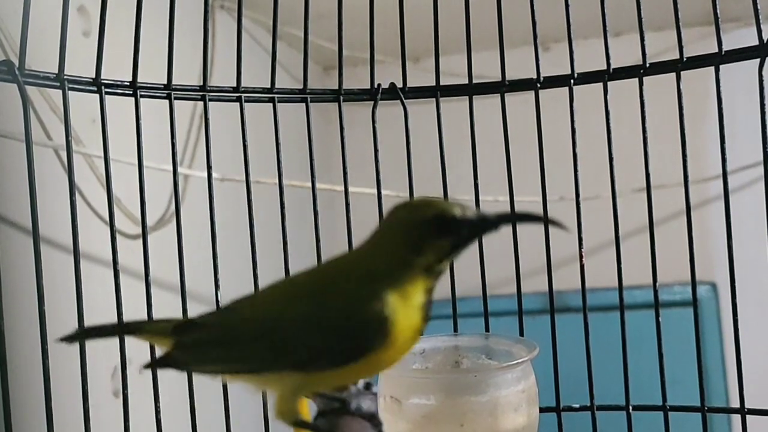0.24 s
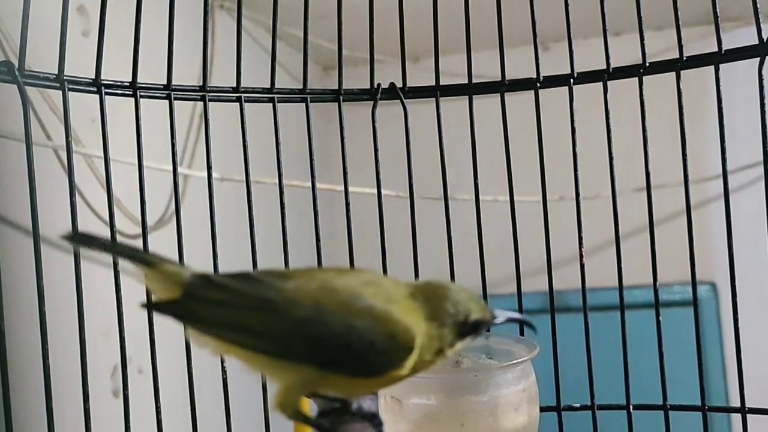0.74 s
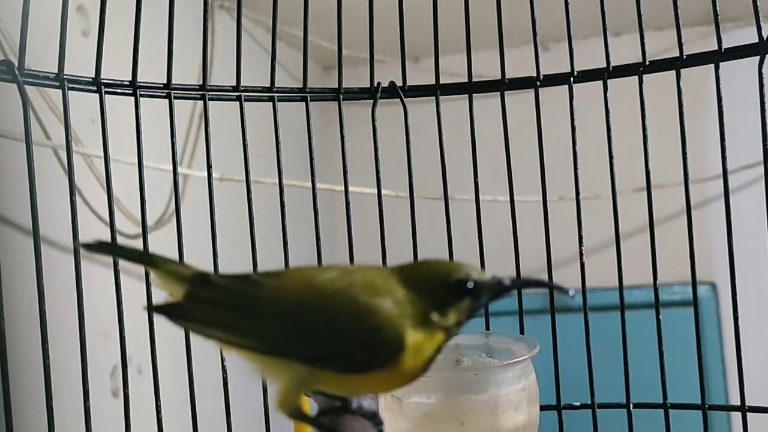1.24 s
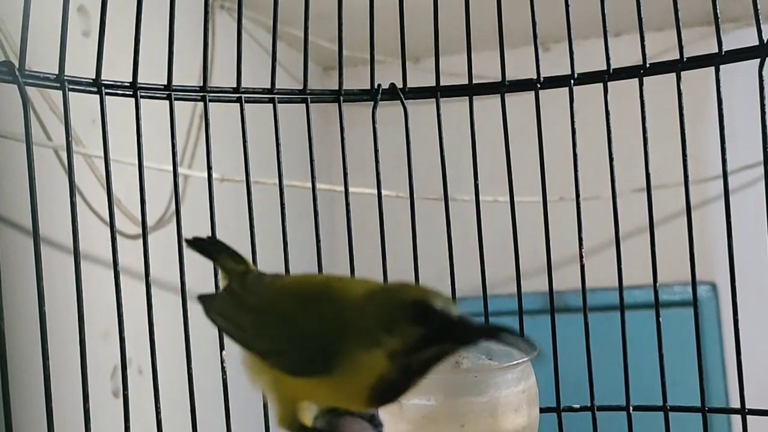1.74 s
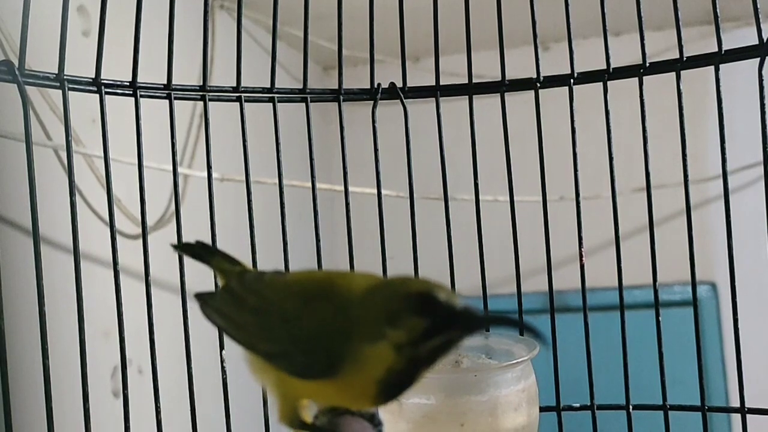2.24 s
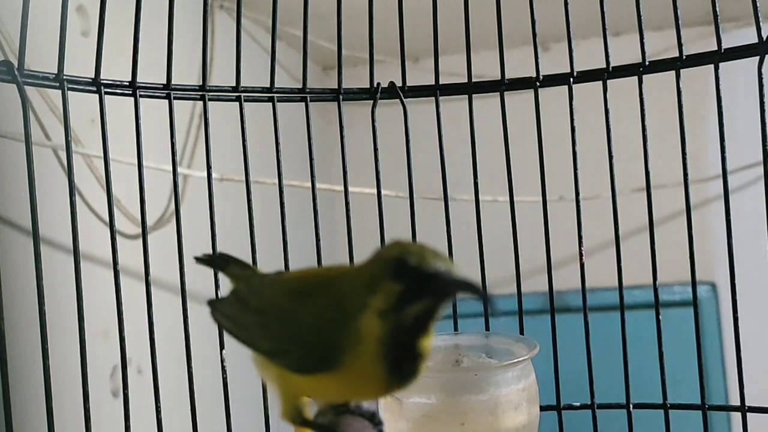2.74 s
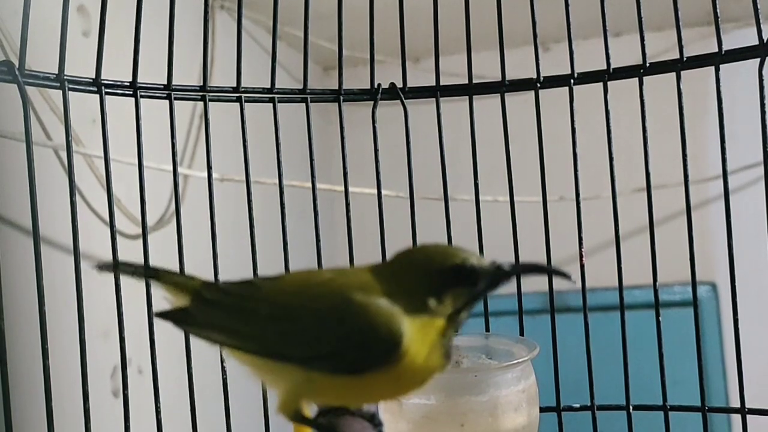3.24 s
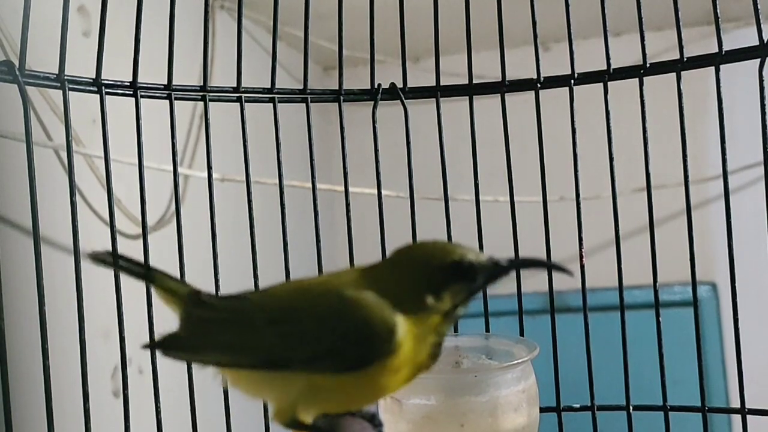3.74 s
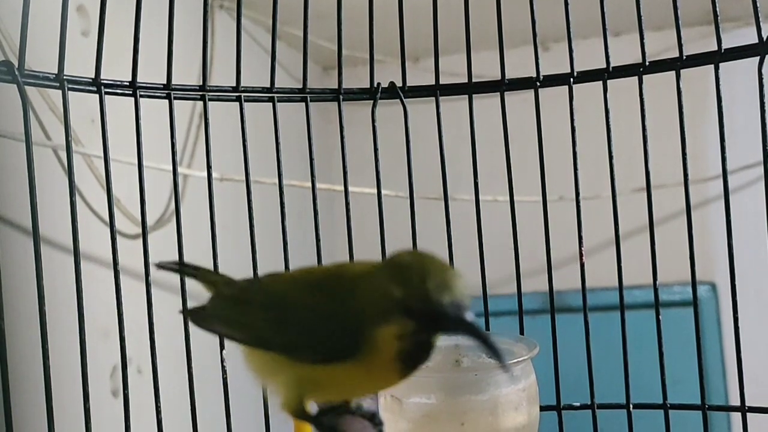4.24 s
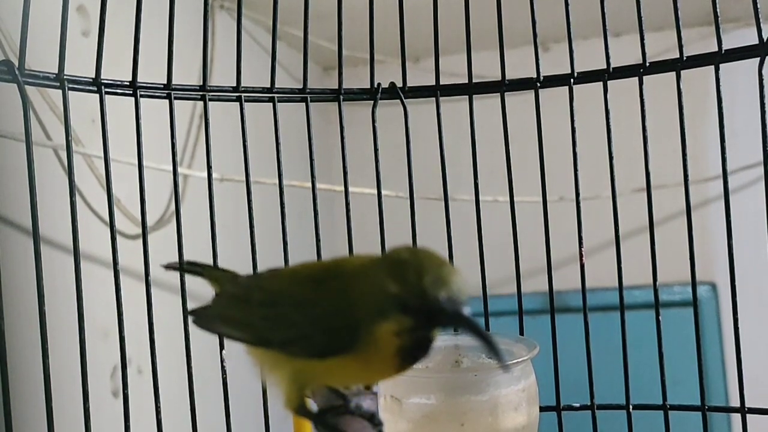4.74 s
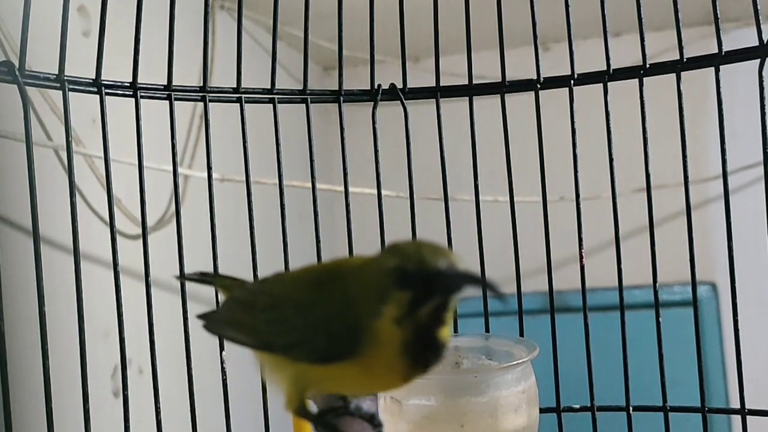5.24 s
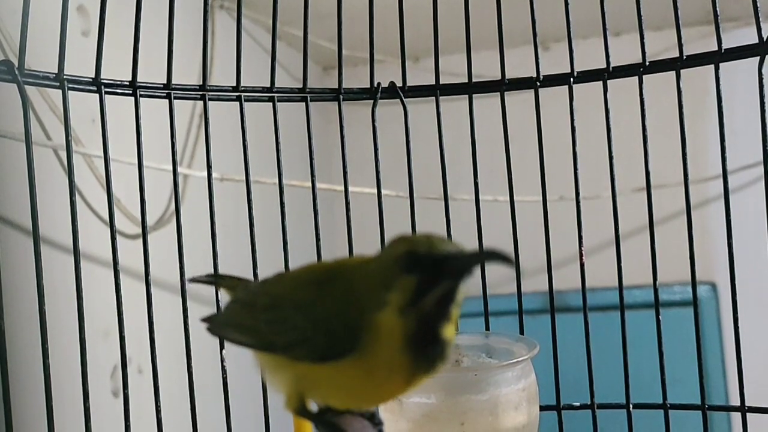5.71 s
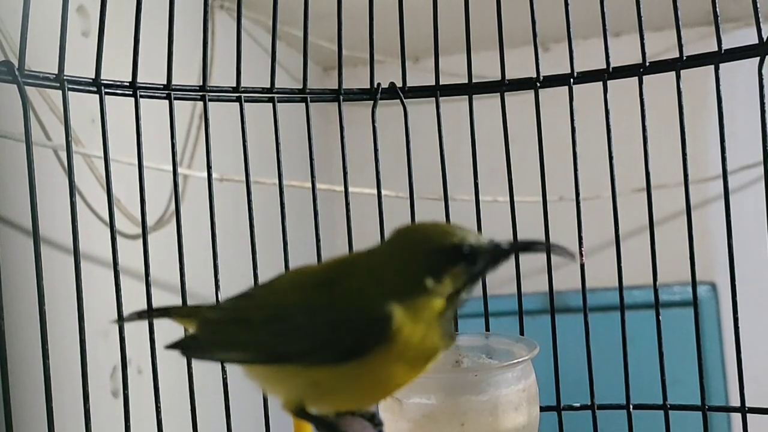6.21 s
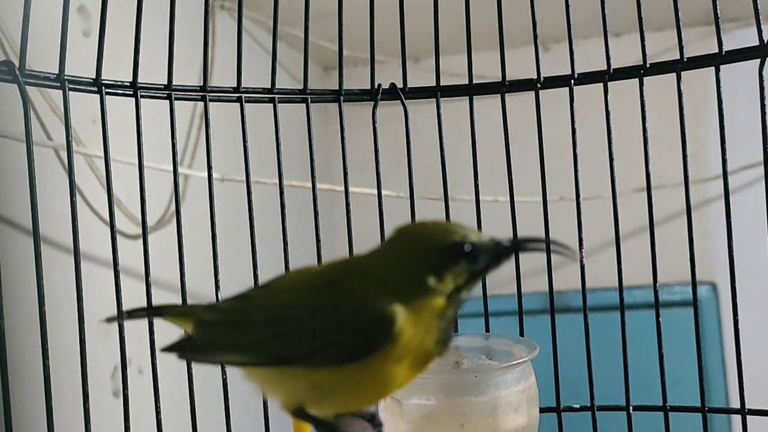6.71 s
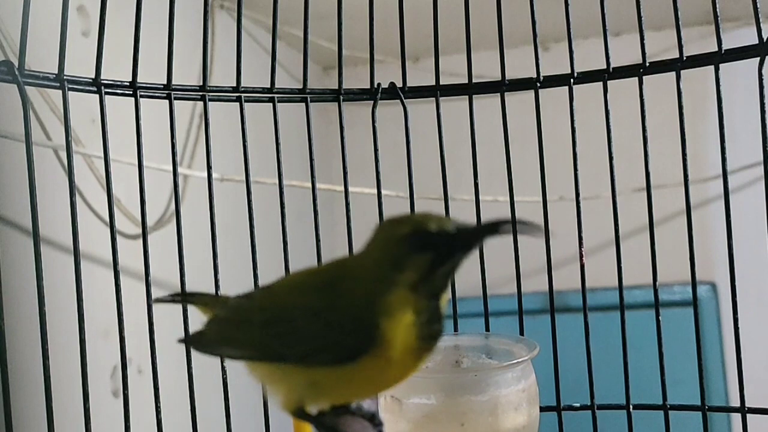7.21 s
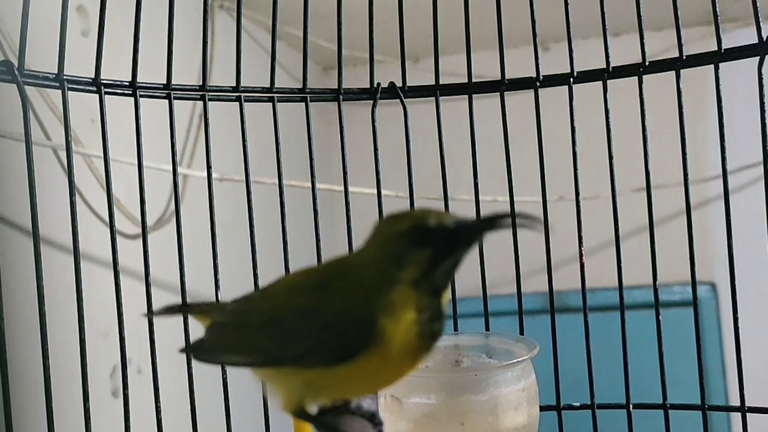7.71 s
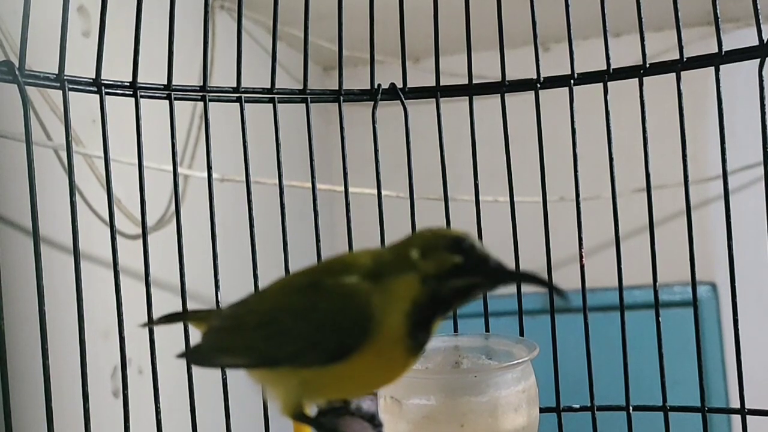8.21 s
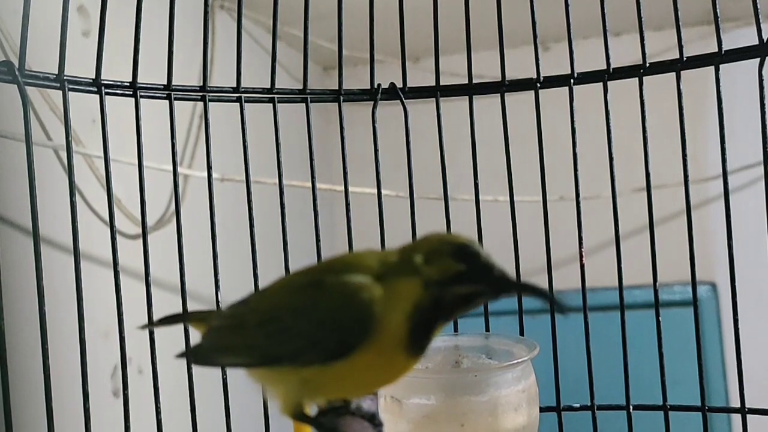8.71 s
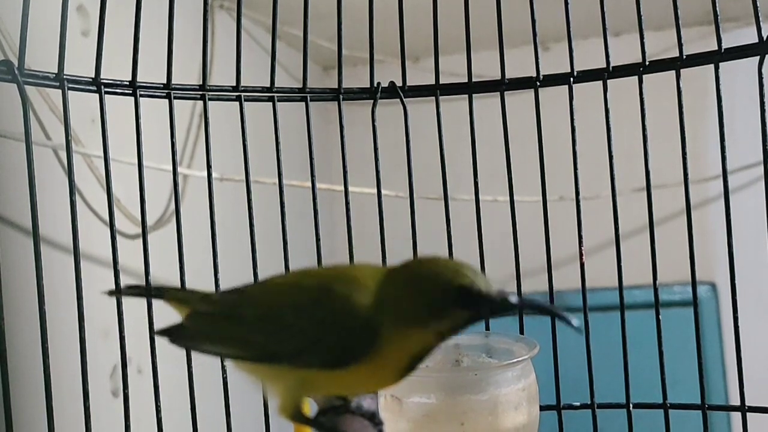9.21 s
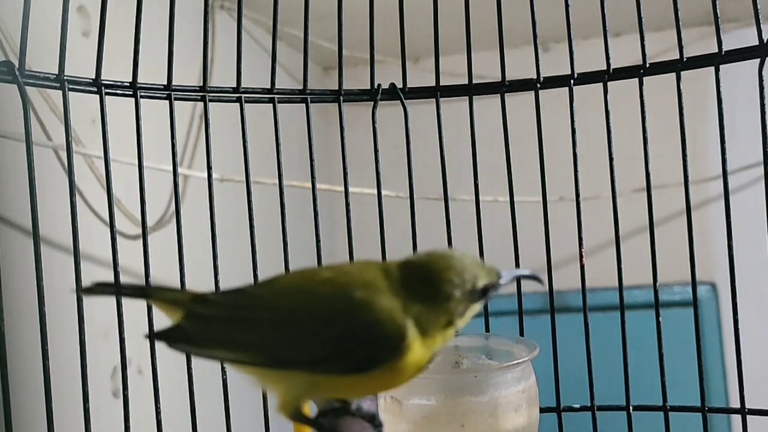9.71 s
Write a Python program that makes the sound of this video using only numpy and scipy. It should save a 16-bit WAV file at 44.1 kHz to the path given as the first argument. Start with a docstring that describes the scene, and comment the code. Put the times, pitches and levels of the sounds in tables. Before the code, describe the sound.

In a small hard-walled room, a caged sunbird close to the microphone softly rustles and bumps its perch, gives a faint scratch, a bright whistle with a squawk, then one loud rasping cheep. After a brief pause it begins quiet chips that thicken into faster, louder twittering with slurs and squeaks. Other small birds chirp thinly farther off, over soft air rush and faint low hum.

```python
"""In a small hard-walled room, a caged sunbird sings close to a camera: a rustle of wings, a few calls with one
loud rasping cheep, then a twitter that grows quicker and louder. Its chips, arching slurs, scratchy rasps and
winding calls are harmonics of one syrinx, shaped by throat and gape, sliding between clean tone and noise.
Other small birds chirp farther off as thin sets of lines, heard mostly through the room's echoes.
Shaped noise makes a low rush of air, and a wavering sine makes a motor's hum."""
import sys
import numpy as np
from scipy import signal
from scipy.fft import rfft, irfft, next_fast_len
from scipy.io import wavfile
from scipy.ndimage import uniform_filter1d, map_coordinates

SR = 44100
rng = np.random.default_rng(int(sys.argv[2]) if len(sys.argv) > 2 else 0)


def inscribe(sig):
    """Save sig as 16-bit PCM at rate SR to the path in sys.argv[1].

    A 1-D sig is mono; a 2-D sig holds one channel per row.
    Samples are clipped to [-1, 1] before scaling.
    """
    pcm = np.round(np.clip(np.atleast_2d(sig).T, -1, 1) * 32767)
    wavfile.write(sys.argv[1], SR, pcm.astype(np.int16))


N = 438794


def amp(db):
    """Decibels to gain."""
    return 10 ** (np.asarray(db) / 20)


def unit(x):
    """Scale to rms 1."""
    return x / np.sqrt(np.mean(x ** 2) + 1e-20)


def along(points, hz):
    """Read (Hz, value) points on a log axis."""
    f, v = np.transpose(points)
    return np.interp(np.log(np.abs(hz) + 1), np.log(f + 1), v)


def curves(rows, t):
    """Each column after the time, read at the times t."""
    s, *cols = np.transpose(rows)
    return [np.interp(t, np.sort(s), c) for c in cols]


def wobble(rate, size):
    """A smooth random curve with rate knots a second."""
    knots = rng.standard_normal(int(size * rate / SR) + 4)
    return map_coordinates(knots, [np.arange(size) * rate / SR])


def filtered(x, response):
    """x times a complex response of frequency."""
    m = next_fast_len(N + SR // 2)
    spectrum = rfft(x, m) * response(np.fft.rfftfreq(m, 1 / SR))
    return irfft(spectrum, m)[..., :N]


def add(track, t, sound):
    """Mix a sound into a track at its times."""
    track[round(t[0] * SR):][:len(t)] += sound


def partial(phase, rough, rasp_rate):
    """One line of a voice; chaotic vibration spreads the rough share of it into a band."""
    rough = np.clip(rough, 0, 1)
    chaos = wobble(rasp_rate, len(phase)) * np.sin(phase) + wobble(rasp_rate, len(phase)) * np.cos(phase)
    return np.sqrt(2 * (1 - rough ** 2)) * np.sin(phase) + rough * chaos


# Colour of the rushing air. Each row: frequency in Hz, relative level in dB.
AIR_COLOUR = [(25, -1), (120, -9.5), (265, -3.5), (305, -4.5), (345, 1), (400, -6), (950, -11), (5000, -23),
              (7500, -34.5), (10000, -50.5), (15000, -61)]
# How alike the air is left and right. Each row: frequency in Hz, likeness 0-1.
AIR_LIKENESS = [(60, 0.58), (300, 0.79), (700, 0.23), (1400, 0)]
# Swells of the motor. Each row: time in seconds, hum level in dB.
HUM_LEVEL = [(0, -60), (1.2, -54.5), (2.2, -54), (2.9, -62), (4, -61.5), (5.3, -55.5), (6.4, -55.5),
             (7.3, -66), (9.95, -58.5)]


def background(air_db=-53.5, drift_db=.4, hum_hz=48.8, waver_hz=0.51):
    """Air rushes softly, alike on both sides only in the bass; a motor hums under it."""
    def colour(hz):
        turn = np.arccos(np.clip(along(AIR_LIKENESS, hz), -1, 1)) / 2
        return amp(along(AIR_COLOUR, hz)) * [np.cos(turn), np.sin(turn)]

    mid, side = filtered(rng.standard_normal((2, N)), colour)
    air = amp(air_db + drift_db * wobble(2.6, N)) * unit(np.array([mid + side, mid - side]))
    hum_pitch = hum_hz + waver_hz * wobble(6.3, N)
    hum = unit(np.sin(2 * np.pi * np.cumsum(hum_pitch) / SR))
    return air + amp(curves(HUM_LEVEL, np.arange(N) / SR)[0]) * hum


def hop(start=0.14, length=0.048, wing_db=-53, wing_top_hz=3000, perch_hz=200, perch_db=-57, perch_t60=0.45):
    """The bird turns round: a soft flick of the wings, then its feet bump the perch."""
    wings, t = np.zeros(N), np.arange(SR // 2) / SR
    flick = np.sin(np.pi * np.minimum(t / length, 1))
    add(wings, start + t, flick * rng.standard_normal(len(t)))
    track = amp(wing_db) * filtered(wings, lambda hz: 1 / (1 + (hz / wing_top_hz) ** 2))
    bump = amp(perch_db - 60 * t / perch_t60) * np.sin(2 * np.pi * perch_hz * t)
    add(track, start + length / 2 + t, bump)
    return track


# Birds farther off. Each row: start in seconds, length in seconds, level in dB before the layer's trim,
# average pitch in Hz (roughly), rise to the crest as a share of the pitch (negative dips),
# roughness (the bands are fully rough from 1, side lines keep growing).
FAR_CHIRPS = [(.168, 0.054, -47.5, 5520, 0.11, 0.96), (.258, 0.025, -45, 5570, 0.051, 0.63),
              (.85, 0.039, -61.5, 5340, 0.04, 0.4), (1.42, 0.038, -45, 5440, 0.042, 0.95),
              (1.51, 0.071, -46.5, 5720, 0.06, 0.75), (1.52, 0.072, -50.5, 4233, 0.03, 0.42),
              (2.33, 0.1, -63, 5190, 0.026, 0), (3.16, 0.085, -52, 5570, 0.051, 0.05),
              (3.235, 0.068, -61, 3870, 0.1, 0.2), (3.33, 0.058, -52, 4320, -0.027, 0.2),
              (5.185, 0.057, -53, 5920, 0.1, 1.1), (5.246, 0.06, -43, 5400, 0.27, 0.54),
              (8.33, 0.038, -47.5, 5510, -0.003, 1.2), (8.49, 0.041, -51, 5960, -0.015, 0.75),
              (8.98, 0.046, -61, 5500, 0.016, 0.5), (9.168, 0.056, -55, 5800, 0.05, 0.6),
              (9.41, 0.058, -57, 6120, 0.088, 1.1), (9.485, 0.066, -50, 5220, 0.059, 0.37),
              (9.52, 0.024, -55.5, 7250, 0.065, 1.05)]
# Lines of a far chirp. Each row: multiple of its pitch, relative level in dB (side lines: at roughness 1).
FAR_CHIRP_LINES = [(0.752, -6.5), (1, 3.5), (1.248, -12), (1.649, -20)]


def far_birds(trim_db=-7, crest=0.87, count=14, faint_s=0.054, faint_db=-62, faint_hz=5100,
              faint_octaves=0.24, faint_rise=0.015, faint_rough=0.56):
    """Thin chirps bend up to a crest or dip, swelling and fading; fainter ones come at random."""
    chirps = np.zeros(N)
    faint = []
    for when, tune in rng.random((count, 2)):
        start = when * (N / SR - 2 * faint_s)
        hz = faint_hz * 2 ** (faint_octaves * (tune - .5))
        faint.append((start, faint_s, faint_db, hz, faint_rise, faint_rough))
    for start, length, db, hz, rise, rough in list(FAR_CHIRPS) + faint:
        t = np.arange(start, start + length, 1 / SR)
        u = np.linspace(0, 1, len(t))
        pitch = hz * (1 + rise * (1 / 3 - (1 - u / crest) ** 2))
        phase = 2 * np.pi * np.cumsum(pitch) / SR
        voice = 0
        for multiple, line_db in FAR_CHIRP_LINES:
            share = 1 if multiple == 1 else abs(rough)
            voice = voice + amp(line_db) * share * partial(multiple * phase, rough, 1700)
        add(chirps, t, amp(db + trim_db) * np.abs(np.sin(np.pi * u)) ** 0.27 * voice)
    return chirps


# How wide the beak stands, here and in the syrinx. Each row: time in seconds, gape 0-1.
BEAK_GAPE = [(0.6, 0.3), (1.87, 0.72), (1.95, 0.5), (2.6, 0.92), (3.3, 0), (5.8, 0), (6.5, 0.2),
             (7.4, 0.14), (7.9, 0.33)]


def sunbird(notch_hz=3280, notch_width_hz=140, open_width_hz=210, notch_db=-6, open_notch_db=-20,
            low_cut_hz=880):
    """Every gesture is sung by the same syrinx; a notch in its timbre deepens and widens as the beak opens."""
    song = np.zeros(N)
    gestures = [call(rows) for rows in WINDING_CALLS.values()]
    gestures += [rasp(*row) for row in RASP_NOTES]
    gestures += [chip(*row) for row in CHIP_NOTES]
    gestures += [slur(*row) for row in SLUR_NOTES]
    for t, *controls in gestures:
        add(song, t, syrinx(t, *controls))
    gape = np.clip(curves(BEAK_GAPE, np.arange(N) / SR)[0], 0, 1)
    song += (1 - gape) * hiss(gestures)
    depth_db = np.array([[notch_db], [open_notch_db]])
    width_hz = np.array([[notch_width_hz], [open_width_hz]])

    def timbre(hz):
        notch = amp(depth_db * np.exp(-((hz - notch_hz) / width_hz) ** 2 / 2))
        return notch * (1 - 1 / (1 + (hz / low_cut_hz) ** 6))

    closed, wide = filtered(song, timbre)
    return (1 - gape) * closed + gape * wide


# Half-open times of the syrinx: before a note starts, and after it ends.
ATTACK_S, RELEASE_S = 0.0077, 0.0021


def stroke(start, length):
    """The times of a note, and how far through it they are (0-1)."""
    t = np.arange(start - ATTACK_S, start + length + RELEASE_S, 1 / SR)
    return t, np.clip((t - start) / length, 0, 1)


def valve(t):
    """The syrinx opens at the start of a note and shuts at its end."""
    opening = np.minimum((t - t[0]) / ATTACK_S, (t[-1] - t) / RELEASE_S) / 2
    return np.sin(np.pi / 2 * np.clip(opening, 0, 1)) ** 2


# Overall colour of the sung notes, strongest from 1 to 4 kHz, thin in the treble.
# Each row: frequency in Hz, relative level in dB.
SONG_COLOUR = [(600, -27), (1150, 11), (1600, 3.5), (2050, 6), (2900, 8), (3900, 5), (6000, -2.5),
               (7500, -11), (8800, -23.5), (11500, -19.5), (13800, -22)]


def syrinx(t, pitch, db, rough, throat_hz, jitter=.04, jitter_rate=380, quaver=.025, quaver_rate=130,
           throat_db=10, throat_octaves=0.33, flutter_db=3.5, rasp_rate=1100, doubling_db=-1.5,
           strain_db=0.5, gape_db=-30, gape_low_hz=3350, gape_high_hz=7900, gape_top=0.63,
           buzz_db=3.5, blur_hz=7500, voice_db=-0.04):
    """One note: harmonics of the syrinx sweep through the throat resonance, which lifts whichever is nearest."""
    orders = np.arange(2, 18)[:, None] / 2  # harmonics 1 to 8.5 in half steps
    # the less stable the vibration, the more its pitch shakes and its strength buzzes
    rough = np.clip(rough, 0, 1)
    shake = jitter * rough * wobble(jitter_rate, len(t))
    shake = shake + quaver * np.sqrt(rough) * wobble(quaver_rate, len(t))
    pitch = uniform_filter1d(pitch, size=70) * (1 + shake)
    db = db + buzz_db * rough ** 2 * wobble(jitter_rate, len(t))
    hz = orders * pitch
    # period doubling, in a rough or strained voice, puts lines halfway between the harmonics
    strain = amp(np.minimum(db - strain_db, 0))
    source = np.where(orders % 1, amp(doubling_db) * np.maximum(rough, strain), 1)
    throat = throat_db * np.exp(-(np.log2(hz / throat_hz) / throat_octaves) ** 2 / 2)
    # a wide-open beak gathers the voice into one band and sheds the partials outside it
    outside = 1 / (1 + (hz / gape_low_hz) ** 20) + gape_top / (1 + (gape_high_hz / hz) ** 20)
    shedding = gape_db * curves(BEAK_GAPE, t)[0] * outside
    colour = along(SONG_COLOUR, hz)
    flutter = flutter_db * np.array([wobble(140, len(t)) for _ in orders])
    weights = source * amp(throat + colour + shedding + flutter) * (hz < SR / 2)
    weights /= np.linalg.norm(weights, axis=0)  # timbre leaves the loudness alone
    # the highest harmonics blur into noise even in a clear note
    blurred = rough + (1 - rough) / (1 + (blur_hz / hz) ** 6)
    phases = 2 * np.pi * np.cumsum(hz, axis=1) / SR
    lines = [partial(phase, blur, rasp_rate) for phase, blur in zip(phases, blurred)]
    return amp(db + voice_db) * valve(t) * np.sum(weights * lines, axis=0)


# Colour of the air rushing through a rasping syrinx. Each row: frequency in Hz, relative level in dB.
HISS_COLOUR = [(400, -24), (900, 8), (2600, 12.5), (6800, -5), (8800, -24.5), (15000, -9.5)]


def hiss(gestures, level_db=-15):
    """Turbulent air adds a broad noise to the voice wherever it rasps."""
    air = np.zeros(N)
    for t, _, db, rough, _ in gestures:
        add(air, t, amp(db + level_db) * rough ** 2 * valve(t) * rng.standard_normal(len(t)))
    return filtered(air, lambda hz: amp(along(HISS_COLOUR, hz)))


def swell(u, loudest, rise_db, fade_db):
    """Effort in dB: it moves to its loudest moment, then fades; a negative rise starts loud instead."""
    return np.interp(u, [0, np.clip(loudest, .05, .95), 1], [-rise_db, 0, -fade_db])


def clearing(u, rough, onset, clear_by, break_from, ending):
    """A note starts as a rasp, clears to its own roughness and frays again at the end."""
    return np.interp(u, np.sort([0, clear_by, break_from, 1]), [onset, rough, rough, ending])


# Calls that slide between tone and rasp, by name. Each row: time in seconds, pitch in Hz, level in dB,
# roughness (the voice is fully rough from 1, the hiss keeps growing), throat resonance in Hz.
WINDING_CALLS = { "scratch": [(.557, 1775, -41.5, 0.7, 3570), (.57, 2300, -32.5, 1.03, 4740),
                 (.581, 2590, -35, 0.5, 5070), (.593, 1852, -27.5, 0.64, 3400),
                 (.607, 1830, -36, 0.6, 3500), (.662, 1710, -38, 0.88, 3230)],
                 "whistle": [(1.857, 2380, -32.5, 0.54, 4870), (1.864, 2560, -21.5, 0.2, 5230),
                 (1.8689, 3355, -21, 0.08, 6620), (1.875, 2970, -23.5, 0.11, 6000),
                 (1.8785, 3470, -20, .05, 6700), (1.8825, 2620, -20, 0.1, 5200),
                 (1.8865, 1820, -14, 0.1, 3930)], "squawk": [(1.924, 1965, -21, 0.9, 4400),
                 (1.931, 2033, -21, 0.9, 5800), (1.942, 2320, -21.5, 0.75, 7300),
                 (1.952, 2090, -21, 0.9, 6700), (1.96, 2210, -27, .7, 6700),
                 (1.973, 2150, -36.5, 0.7, 6540)], "cheep": [(2.528, 1712, -22, 1.2, 5400),
                 (2.539, 1705, -16, .75, 5820), (2.588, 1672, -15.5, 0.42, 5390),
                 (2.607, 1770, -16, 0.5, 5110), (2.626, 1900, -12, 0.15, 4770),
                 (2.648, 1964, -11.5, 0.03, 5200), (2.664, 2017, -13, 0.01, 6100),
                 (2.712, 2084, -8, 0.14, 6300), (2.733, 2003, -13.5, .38, 6400),
                 (2.777, 1842, -16, 0.5, 5700), (2.793, 1720, -29, 0.6, 5400)],
                 "buzz": [(4.876, 1372, -37, 0.8, 3900), (4.893, 1480, -33.5, .25, 4300),
                 (4.906, 1490, -26.5, 0.06, 4600), (4.917, 1357, -30, .15, 4100),
                 (4.929, 1330, -50, 0.4, 3800), (4.945, 1878, -31, 0.6, 4000),
                 (4.966, 2016, -35.5, .45, 4230), (4.981, 1835, -35, 0.5, 3800),
                 (4.989, 1970, -31.5, .08, 4000), (5.008, 2198, -25.5, 0.1, 4320),
                 (5.022, 1988, -23.5, .15, 4860), (5.033, 1865, -21.5, .5, 4640),
                 (5.049, 2096, -35, 0.7, 4400)], "squeak": [(7.058, 3230, -32.5, 0.7, 4000),
                 (7.067, 4170, -19, .55, 4400), (7.072, 4760, -16.5, 0.2, 4600),
                 (7.083, 4020, -16.5, .45, 4070), (7.091, 2850, -22.5, 0.7, 3220)],
                 "churr": [(7.143, 1341, -23.5, 0.9, 4700), (7.153, 1870, -22.5, .75, 4940),
                 (7.168, 2795, -23, 0.7, 5100), (7.186, 2300, -23, .2, 4730), (7.2, 1975, -23, .22, 5800),
                 (7.217, 1831, -18.5, .45, 5400)]}


def call(rows):
    """A call follows its own course of pitch, effort, roughness and throat."""
    t, _ = stroke(rows[0][0], rows[-1][0] - rows[0][0])
    return t, *curves(rows, t)


# Scratchy notes that never clear. Each row: start in seconds, length in seconds, loudest level in dB,
# mid-note pitch in Hz, throat resonance in Hz.
RASP_NOTES = [(3.287, 0.048, -39.5, 1635, 3600), (6.619, 0.02, -24, 1752, 3820),
              (6.818, 0.018, -29, 2080, 4100)]


def rasp(start, length, db, hz, throat_hz, sag=0.21, loudest=0.43, rise_db=7.5, fade_db=1, rough=.93):
    """Chaotic vibration throughout, on a slightly sagging pitch."""
    t, u = stroke(start, length)
    pitch = hz * (1 - sag * (u - .5))
    return t, pitch, db + swell(u, loudest, rise_db, fade_db), rough, throat_hz


# Short notes that flick up and fall. Each row: start in seconds, length in seconds, loudest level in dB,
# top pitch in Hz, pitch the fall heads for in Hz, roughness once clear 0-1, throat resonance in Hz.
CHIP_NOTES = [(3.418, 0.041, -33, 3770, 2048, 0, 3680), (3.546, 0.048, -29.5, 2547, 1466, 0.3, 3847),
              (3.728, 0.034, -24, 2134, 1633, 0.1, 3680), (3.914, 0.031, -27, 2447, 1797, 0.23, 4800),
              (4.102, 0.034, -26.5, 3033, 1407, 0.2, 3480), (4.167, 0.035, -25, 2082, 1517, 0.21, 3380),
              (4.362, 0.035, -24.5, 2210, 1717, 0.12, 3770), (4.557, 0.03, -22.5, 1984, 1745, 0.19, 3880),
              (4.783, 0.029, -26, 3110, 1990, 0.1, 4630), (5.611, 0.039, -27, 3120, 1810, 0.4, 4270),
              (6.093, 0.036, -25.5, 3457, 1773, 0.4, 3870), (6.235, 0.04, -24, 3060, 2100, 0.4, 3230),
              (6.665, 0.04, -22.5, 2750, 1543, 0.7, 5100), (6.743, 0.026, -20, 2188, 1862, 0.6, 3950),
              (7.357, 0.053, -21, 2630, 1770, 0.12, 4180), (7.6, 0.034, -17.5, 4220, 3820, 0.2, 4810),
              (7.691, 0.022, -18, 1950, 1520, 0.15, 6100), (7.839, 0.036, -18, 2150, 1777, 0.05, 5400),
              (7.944, 0.031, -18.5, 2000, 1476, 0.2, 6300), (8.063, 0.033, -17.5, 2394, 1552, 0.3, 5650)]


def chip(start, length, db, top_hz, end_hz, rough, throat_hz, top=.3, scoop=0.44, fall=.39, bend=1.59,
         loudest=0.73, rise_db=11, fade_db=5.5, fray=0.57):
    """The pitch flicks up to its top, then drops and levels out."""
    # top, fall and loudest are shares of the length; scoop is a share of the pitch
    t, u = stroke(start, length)
    up = top_hz * (1 - scoop * (1 - u / top) ** 2)
    down = end_hz + (top_hz - end_hz) * np.exp(-(np.abs(u - top) / fall) ** bend)
    pitch = np.where(u < top, up, down)
    rough = clearing(u, rough, onset=0.9, clear_by=0.64, break_from=0.87, ending=rough + fray)
    return t, pitch, db + swell(u, loudest, rise_db, fade_db), rough, throat_hz


# Longer notes that arch. Each row: start in seconds, length in seconds, level at the note's peak moment in dB,
# start pitch in Hz, top pitch in Hz, end pitch in Hz, place of the top 0-1, swell in dB,
# roughness once clear 0-1, place where it frays 0-1, mid-note throat resonance in Hz.
SLUR_NOTES = [(3.816, 0.039, -27, 1422, 2006, 2065, 0.6, 5, 0.3, 0.9, 3480),
              (5.707, 0.077, -33, 992, 2482, 1744, 0.55, -3, 0.18, 1, 4150),
              (5.877, 0.087, -30, 942, 2137, 1854, 0.45, 2, 0.08, 0.7, 4320),
              (6.383, 0.086, -25, 1815, 2832, 1900, 0.4, 6.5, 0.3, .6, 3560),
              (6.512, 0.063, -22.5, 1274, 1920, 1833, 0.7, 1.5, 0.2, .9, 4800),
              (6.837, 0.073, -23, 2736, 3446, 1905, 0.3, 2, 0.25, .62, 4070),
              (6.93, 0.075, -28.5, 1920, 2510, 2306, 0.7, -2, 0.45, .7, 4200),
              (7.459, 0.089, -22, 983, 2158, 1790, 0.5, 4, 0.2, .75, 4650),
              (7.734, 0.041, -28.5, 1753, 2076, 2000, 0.75, -0.5, 0.4, 0.8, 5530)]


def slur(start, length, db, start_hz, top_hz, end_hz, top, swell_db, rough, fray_from, throat_hz,
         climb_bend=1.7, throat_climb_octaves=0.46, loudest=0.74, fade_db=1.5):
    """The pitch climbs out of a rasp, arches over and sinks while the throat brightens and the note frays."""
    t, u = stroke(start, length)
    up = top_hz + (start_hz - top_hz) * np.abs(1 - u / top) ** climb_bend
    down = top_hz + (end_hz - top_hz) * np.sin(np.pi / 2 * (u - top) / (1 - top)) ** 2
    pitch = np.where(u < top, up, down)
    rough = clearing(u, rough, onset=.85, clear_by=0.51, break_from=fray_from, ending=0.69)
    throat = throat_hz * 2 ** (throat_climb_octaves * (u - .5))
    return t, pitch, db + swell(u, loudest, swell_db, fade_db), rough, throat


def direct(x, left_lead_ms, left_db):
    """Sound from one side reaches one microphone a little sooner and louder."""
    sides = np.array([[.5], [-.5]])
    return amp(sides * left_db) * filtered(x, lambda hz: np.exp(2j * np.pi * hz * sides * left_lead_ms / 1000))


def close_pair(wet, alike=0.2, alike_hz=6000):
    """Two close microphones share part of each echo; the likeness is lost in the treble."""
    def spread(hz):
        turn = np.arccos(np.clip(alike, 0, 1) / (1 + (hz / alike_hz) ** 4)) / 2
        return np.array([np.cos(turn), np.sin(turn)])

    mid, side = filtered(wet, spread)
    return np.array([mid + side, mid - side])


# How long the walls ring. Each row: frequency in Hz, time to fall 60 dB in seconds.
ROOM_RING = [(2000, 0.34), (5500, 0.29), (13000, 0.33)]


def room(x, early_db, tail_db, early_t60=0.02):
    """Nearby surfaces answer with a short crackle of echoes, while the walls ring on."""
    hz, t, z = signal.stft(rng.standard_normal((2, SR // 2)), SR, nperseg=256)
    tail = signal.istft(z * amp(-60 * t / along(ROOM_RING, hz)[:, None]), SR, nperseg=256)[1]
    # the fifth power leaves a few strong reflections among many weak ones
    early_fade = amp(-60 * np.arange(tail.shape[1]) / SR / early_t60)
    early = rng.standard_normal(tail.shape) ** 5 * early_fade
    answer = 0
    for db, part in [(early_db, early), (tail_db, tail)]:
        answer = answer + amp(db) * part / np.linalg.norm(part, axis=1, keepdims=True)
    delayed = np.pad(x, (SR // 800, 0))  # 1.25 ms before the first echo
    return signal.fftconvolve(delayed[None], answer, axes=1)[:, :N]


def scene():
    """The sunbird and its echoes come from a little left; the others are heard mostly through the room."""
    near, far = sunbird(), far_birds()
    echoes = close_pair(room(near, early_db=-4, tail_db=-6.5))
    song = direct(near + echoes, left_lead_ms=0.12, left_db=1.3)
    others = direct(far, left_lead_ms=-0.288, left_db=-1.5) + room(far, early_db=-2.5, tail_db=4.0)
    return background() + hop() + others + song


def record(dry, threshold_db=-17.0, squeeze=0.59, recovery_db=4.0, top_hz=15750):
    """The camera cuts its gain at loud calls, recovers a few dB a second, and keeps nothing above its band."""
    power = np.abs(uniform_filter1d(np.mean(dry ** 2, axis=0), size=512))
    needed = squeeze * np.maximum(10 * np.log10(power + 1e-12) - threshold_db, 0)
    recovered = recovery_db * np.arange(N) / SR
    cut_db = np.maximum.accumulate(needed + recovered) - recovered
    return filtered(dry * amp(-cut_db), lambda hz: hz < top_hz)


dry = scene()
out = record(dry)
inscribe(out)
```